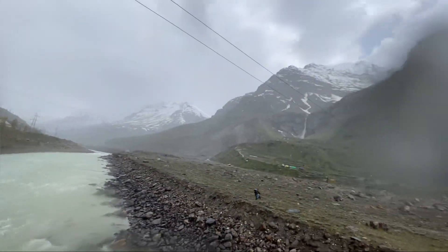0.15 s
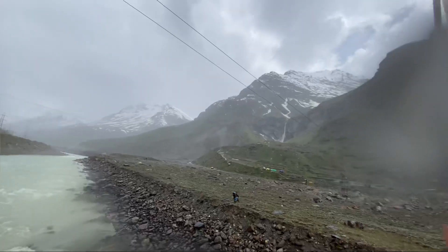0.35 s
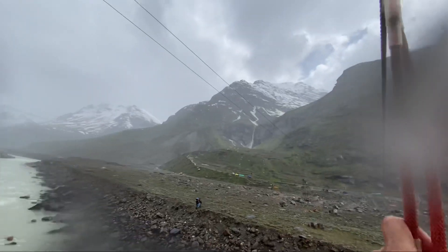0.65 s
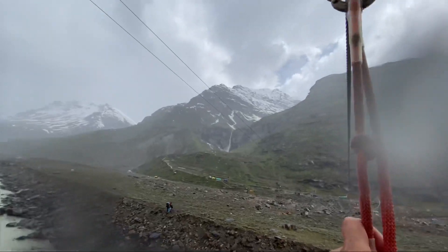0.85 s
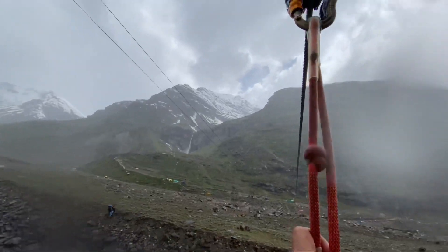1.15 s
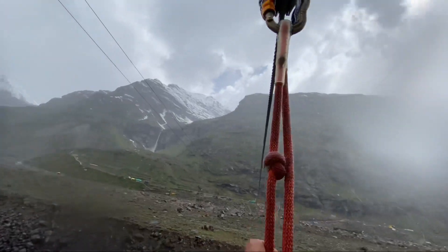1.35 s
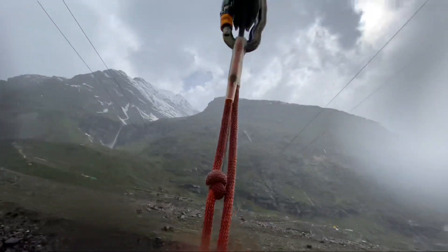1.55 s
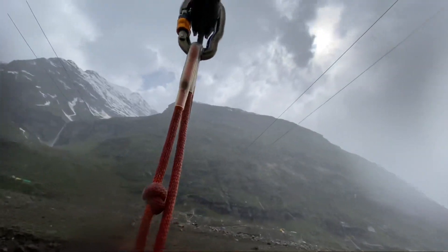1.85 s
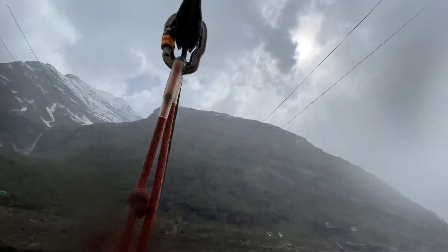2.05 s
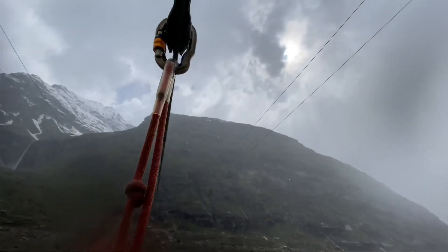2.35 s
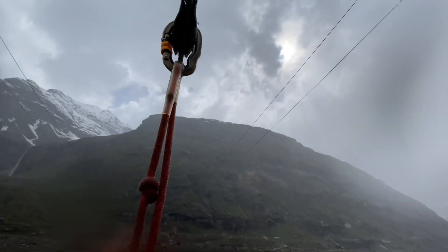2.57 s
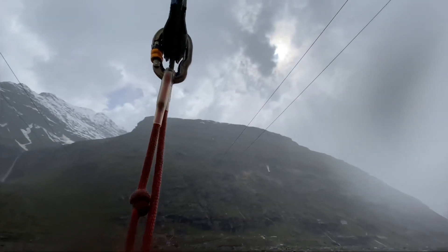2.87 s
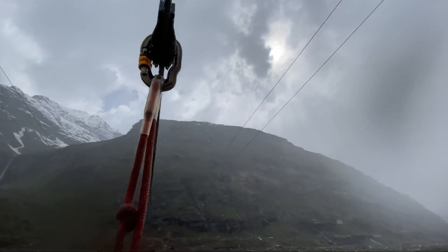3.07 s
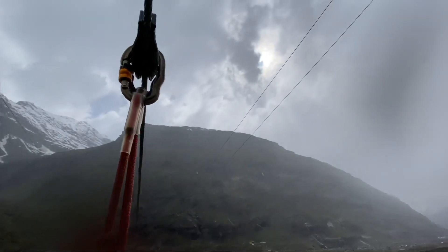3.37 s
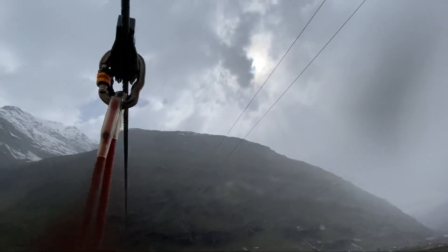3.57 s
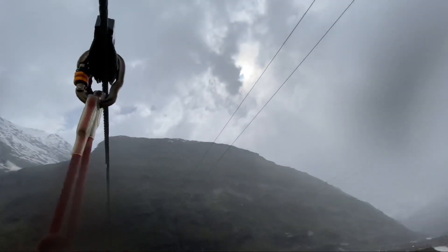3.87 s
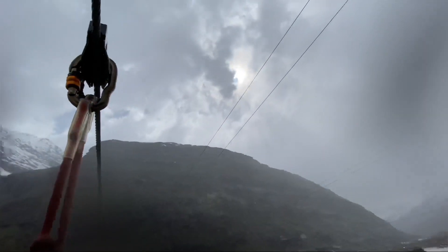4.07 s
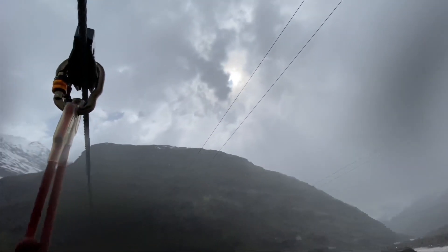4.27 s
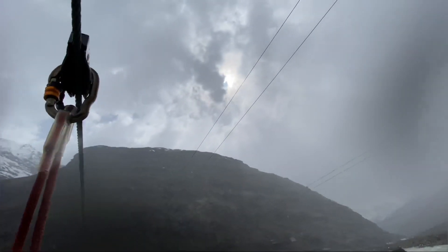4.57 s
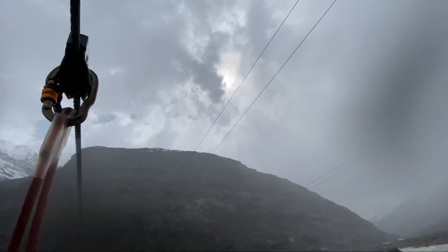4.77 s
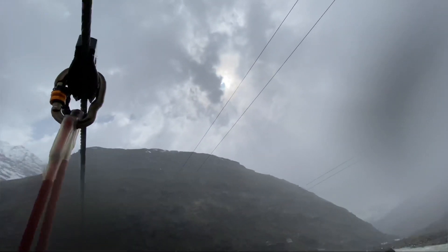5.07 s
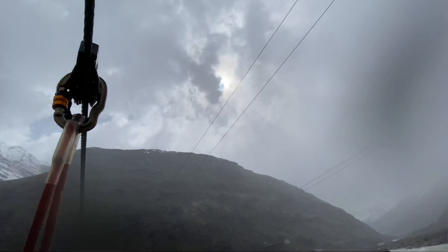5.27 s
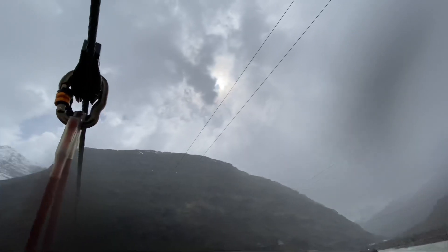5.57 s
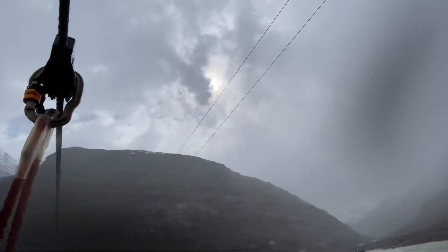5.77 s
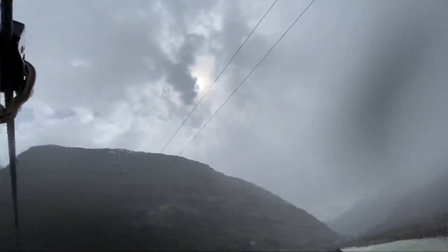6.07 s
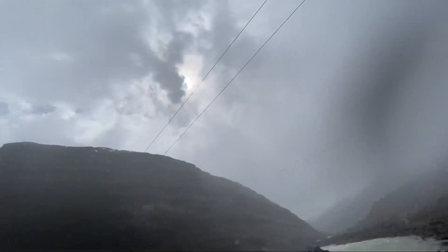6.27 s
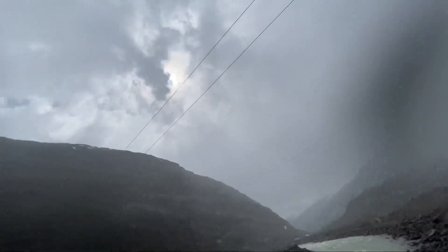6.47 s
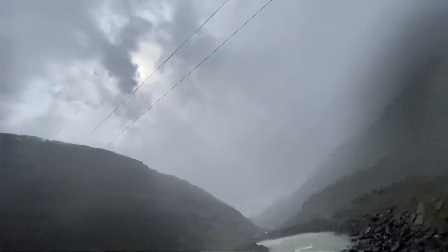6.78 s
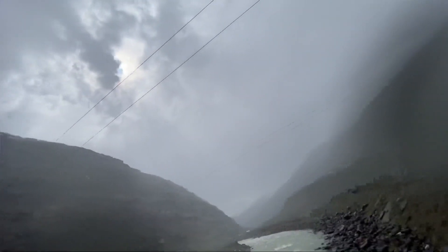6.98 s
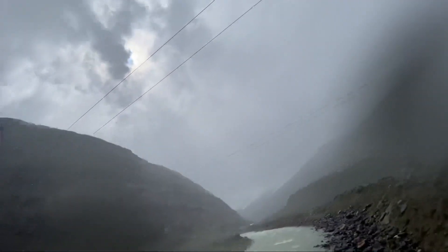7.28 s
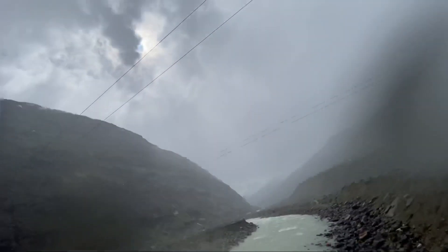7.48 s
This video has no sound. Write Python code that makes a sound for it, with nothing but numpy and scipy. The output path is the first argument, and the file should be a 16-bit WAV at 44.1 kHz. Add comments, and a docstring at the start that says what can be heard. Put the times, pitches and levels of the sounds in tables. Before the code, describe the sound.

Wind gusts over the microphone as a zip line trolley hisses overhead, its thin whine slowly sinking, ending with a few dull harness knocks.

```python
"""Cable trolley in a windy valley

A pulley trolley rolls along a steel cable, heard from just below on a hand-held camera's stereo mics.
Each strand of the cable kicks the sheave: a falling whine and a gritty rush that rings the trolley frame.
Wind buffets and pops right on the mic ports, and the harness knocks as the ride is checked at the end.
The camera slowly turns, shifting the sound from the right port to the left."""
import sys
import numpy as np
from scipy import signal
from scipy.fft import rfft, irfft
from scipy.io import wavfile
from scipy.ndimage import uniform_filter1d

SR = 44100
rng = np.random.default_rng(int(sys.argv[2]) if len(sys.argv) > 2 else 0)


def put_to_file(sound):
    """Save the sound as 16-bit audio at rate SR, in the file named by the first command-line argument."""
    columns = np.atleast_2d(sound).T  # one column per channel
    safe = np.clip(columns, -1, 1)
    whole_steps = np.round(safe * 32767)
    wavfile.write(sys.argv[1], SR, whole_steps.astype(np.int16))


N = 336483
HOP, SIZE = 256, 512  # short-time spectra, in samples

# The trolley slows overhead: time_s, strands_per_s
STRAND_RATE = [(0, 462), (1.7, 442), (2.5, 435), (2.7, 424), (3.1, 412), (3.6, 414), (4.2, 396), (4.8, 383),
               (5.5, 373), (6.15, 355), (7.63, 335)]
# Rate waver of the out-of-true sheave: time_s, once_per_cycle_share, twice_per_cycle_share
SHEAVE_WAVER = [(1.7, .014, .006), (3.5, .011, .012), (4.5, .008, .022), (6.6, .006, .032),
                (7.0, .004, .012)]
def sheave():
    """The wobbling sheave rolls over the strands: mean rate, running strand count and wobble phase."""
    cycle_strands, crest_s = 97.5, 6.52  # length of one wobble, a moment when it peaks
    t = np.arange(N) / SR
    rate_hz = columns(STRAND_RATE, t)[0]
    travel = np.cumsum(rate_hz) / SR
    cycle = 2 * np.pi * (travel - travel[round(crest_s * SR)]) / cycle_strands
    once, twice = columns(SHEAVE_WAVER, t)
    waver = 1 + once * np.cos(cycle) + twice * np.cos(2 * cycle) + 0.0081 * smooth_noise(2500)
    return rate_hz, np.cumsum(rate_hz * waver) / SR, cycle


def strand_kicks(strands, cycle):
    """Two noises pulsed by each strand's own fading kick; loose grit ticks, and each wobble throbs."""
    kick_depth, ticks_per_s, throb_db = 0.083, 600, 0.38
    grit = gain_of(smooth_noise(150))
    strength = gain_of(-2 * rng.standard_normal(N))[strands.astype(int)]
    kicks = 1 + kick_depth * strength * np.exp(-(strands % 1))
    ticking = rng.random(N) < ticks_per_s / SR
    ticks = ticking * gain_of(4 + 1.5 * np.minimum(rng.exponential(size=N), 4))
    throb = gain_of(throb_db * np.cos(cycle + 1.5))  # crests ahead of the pitch
    return unit_rms(kicks * grit * throb * (1 + ticks)) * rng.standard_normal((2, N))


# The camera turns below the trolley: time_s, left_lag_us, low_ring_db, fizz_db, left_over_right_4khz_db
CAMERA_TURN = [(0.0, 144, 4.5, -4, -3.5), (0.25, 125, 4.5, -1, -2.5), (0.6, 63, 0, -5, -1),
               (1.0, 11, 0, -2, -0.2), (1.24, -1, -0.7, -0.5, -0.4), (1.4, -52, -1.5, -1, 0),
               (1.55, -114, -4, 1, -0.5), (1.7, -150, -4.5, 1, 1), (2.0, -213, -7.5, 1, -0.3),
               (2.4, -225, -7.5, -3.5, 0), (2.65, -212, -6, -3, -0.7), (2.92, -224, -6.5, -4.5, -.8),
               (3.2, -250, -8, -4.5, -.6), (3.5, -268, -8.5, -6, -0.2), (3.85, -308, -6, -6.5, -1),
               (4.5, -338, -5.5, -4, -1), (5.2, -320, -6.5, -5, -0.9), (5.55, -306, -6.5, -6, -0.3),
               (5.75, -327, -6, -5.5, -0.8), (6.05, -368, -5.5, -2.5, -1.2), (6.25, -384, -3, -5, -1.5),
               (6.5, -423, -2.5, -7.5, 0.5), (6.85, -451, 0, -6.5, -1.5), (7.05, -455, 2.5, -10.5, 0.5),
               (7.63, -449, 2.5, -7.5, -0.5)]
# Six bearings of the trolley, from left to right: left_lag_us
BEARINGS_US = [-450, -400, -320, -230, 40, 140]
# Frame resonances from below: pitch_hz, width_hz, then level_db at each bearing
FRAME_MODES = [(1020, 175, 8, -13, -1.5, -5.5, -33, 0), (1360, 480, 4.5, -2, -3, -3, -43, -22),
               (1668, 540, -5, -2, 4, 3.5, -3.5, -3.5), (1900, 110, -14, -15, -9, -9, -5, 0),
               (1973, 394, -1.5, -4, 1, 4.5, 4.5, 0), (2496, 800, -1.5, -4.5, 1.5, -0.5, -2.5, -8.5),
               (2900, 300, 3.5, -7, -12, -7, -33, -8), (3170, 233, 4, -1.5, -3.5, -3.5, 1.5, 0),
               (3493, 235, -12, 3, -0.5, 0.5, -2.5, -21), (3830, 120, -14, -12, -11, -2, -8, 3),
               (4380, 150, -14, -12, -14, -10, -3, -8), (3806, 327, -0.5, 0, 1, 2.5, -3.5, 7),
               (4290, 560, -0.5, -8, -5, -2, 3, 3.5), (4606, 210, 2, 0.5, 1, -0.5, -6, 0),
               (4970, 390, 0.5, -5, -12, -6.5, -2, -14), (5370, 650, -2.5, -12, -4.5, -5, -1, -1.5),
               (5890, 320, -8, -24, -11, -14, -8.5, -7), (6230, 1200, 0, -5.5, -8.5, -9.5, -7.5, -12.5),
               (7370, 620, -3, -29, -5.5, -8, -12, -10), (7800, 890, -7, -23, -14, -8.5, -4.5, -7),
               (8500, 400, -6, -14, -24, -18, -12, -12), (8810, 680, -3.5, -7, -4, -6.5, -5, -5),
               (9680, 1050, -6, -12.5, -8, -10.5, -9, -10)]
def frame_ring(hz, times):
    """Gain of the trolley frame's resonances, whose colour changes with the camera's bearing."""
    lag_us, low_db, fizz_db, _ = columns(CAMERA_TURN, times)
    power = 0
    for pitch_hz, width_hz, *bearing_db in FRAME_MODES:
        band_db = low_db if pitch_hz < 2700 else fizz_db if pitch_hz > 6000 else 0
        peak = 1 / (1 + (2 * (hz - pitch_hz) / width_hz) ** 2) ** 1.78
        power = power + peak * gain_of(2 * (np.interp(lag_us, BEARINGS_US, bearing_db) + band_db))
    return np.sqrt(power)


# The rush as it reaches the camera: time_s, relative_level_db
RUSH_LEVEL = [(0.0, -28), (0.2, -29), (0.6, -28.5), (0.9, -30), (1.2, -31), (1.42, -31), (1.62, -31.5),
              (1.9, -29.5), (2.2, -26.5), (2.48, -24.5), (2.62, -27), (2.95, -24), (3.08, -26),
              (3.4, -23.5), (3.52, -24.5), (3.63, -24), (3.8, -24.5), (4.15, -26.5), (4.5, -27),
              (5.62, -27), (5.72, -28), (6.0, -27.5), (6.3, -27.5), (6.4, -23), (6.5, -27.5), (6.75, -31),
              (7.05, -34), (7.3, -28.5), (7.63, -32.5)]
# Brief sags of the rush, deeper in the treble: centre_s, length_s, depth_at_5khz_db
RUSH_SAGS = [(7.052, 0.075, 12.5), (7.14, 0.061, 6), (7.248, 0.071, 8), (7.383, 0.049, 3.5)]
# The highest hiss fades near the end: (start_s, end_s), (start_cut_db, end_cut_db)
HISS_FADE = [(6.6, 7.0), (0, 8)]
# The microphones' colouring of the rush: frequency_hz, gain_db
MIC_COLOUR = [(600, -13), (1300, -2.5), (1500, 0), (10000, 1.5), (11000, 6), (12300, -51), (13000, -32),
              (14300, 9), (15200, -5)]
def rush(strands, cycle):
    """Rolling noise overhead: the kicks ring the frame. Gives short-time spectra of two noises."""
    kicks = spectra(strand_kicks(strands, cycle))
    hz, times = axes(kicks)
    ring = frame_ring(hz, times)
    patches = rng.standard_normal(ring.shape[::-1]).T  # flicker across pitch and time
    patches = uniform_filter1d(patches, size=5, axis=0)
    patches = unit_rms(uniform_filter1d(patches, size=20, axis=1))
    level_db = columns(RUSH_LEVEL, times)[0] + 9.56 + 0.38 * drift(times, top_hz=16) + 1.22 * patches
    sag_db = sum(db * np.exp(-((times - s) / (length / 2)) ** 4) for s, length, db in RUSH_SAGS)
    cut_db = sag_db * (hz / 5000) ** 0.17 + np.interp(times, *HISS_FADE) * (hz > 12500)
    return kicks * ring * gain_of(level_db - cut_db + at_hz(MIC_COLOUR, hz))


# The whine at the strand rate: time_s, base_level_db
WHINE_LEVEL = [(1.7, -55.5), (2.1, -59), (2.55, -60), (2.9, -50.5), (3.45, -51), (3.9, -53), (4.4, -52.5),
               (4.9, -50), (5.5, -50), (6.3, -47.5), (7.02, -44.5)]
# Its octave: time_s, base_level_db
OCTAVE_LEVEL = [(1.7, -63), (2.1, -59), (2.6, -67), (3.2, -62), (3.6, -62), (4.3, -60.5), (5.1, -62),
                (6.1, -54), (7.0, -53)]
# Its harmonics: multiple, lift_db, blur_hz, steady_to_blurred_ratio
HARMONICS = [(1, 1.5, 22, 1.5), (2, 0, 22, 0.9), (3, 6.5, 35, 0.5), (4, 12, 45, .3)]
# When the whine stands clear of the wind: time_s, gain
WHINE_GATE = [(1.62, 0), (1.72, 1), (7.0, 1), (7.05, 0)]
def whine(rate_hz, strands):
    """The sheave sings at the strand rate and its multiples; uneven strands blur the higher ones."""
    t = np.arange(N) / SR
    resonance_hz, width_hz = 410.4, 17  # harmonics 3 and 4 swell as the strand rate passes through
    upper_db = -59 + 10.5 / (1 + (2 * (rate_hz - resonance_hz) / width_hz) ** 2)
    levels_db = [columns(WHINE_LEVEL, t)[0], columns(OCTAVE_LEVEL, t)[0], upper_db, upper_db]
    out = np.zeros(N)
    for (multiple, lift_db, blur_hz, steady), level_db in zip(HARMONICS, levels_db):
        pole = np.exp(-np.pi * blur_hz / SR)
        noise = rng.standard_normal(N) + 1j * rng.standard_normal(N)
        blur = unit_rms(signal.lfilter([1 - pole], [1, -pole], noise))
        envelope = (steady + blur) * np.sqrt(2 / (1 + steady ** 2))
        out += gain_of(level_db + lift_db) * (envelope * np.exp(2j * np.pi * multiple * strands)).real
    return out * columns(WHINE_GATE, t)[0]


# Valley wind on the microphones, base levels: time_s, rumble_db, buffet_db, roar_db
WIND_LEVELS = [(0.0, -54, -40, -35.5), (0.36, -48, -42.5, -37), (0.45, -50, -30, -42.5),
               (0.65, -42, -36, -39.5), (0.85, -43, -34.5, -42), (1.0, -44, -36.5, -40),
               (1.2, -43, -44.5, -42.5), (1.4, -43.5, -44, -46.5), (1.6, -47, -46, -51),
               (1.76, -54, -65, -59), (2.1, -61, -63, -57.5), (2.45, -57, -59, -54.5),
               (2.75, -56, -54, -54.5), (3.05, -51, -53.5, -51), (3.55, -46, -49, -49),
               (3.8, -52, -49, -59), (4.3, -59, -53.5, -56.5), (4.6, -61, -52.5, -56),
               (4.9, -51, -56, -50.5), (5.2, -56, -52.5, -54), (5.5, -57, -49.5, -53.5),
               (5.8, -51.5, -55.5, -54), (6.5, -51, -57, -50.5), (6.82, -52, -52, -51.5),
               (6.93, -60, -53, -39.5), (7.63, -50, -65, -45)]
# Spectra of its three layers, each: frequency_hz, relative_level_db
RUMBLE_COLOUR = [(20, -42), (32, -26), (45, -2), (70, 1.5), (110, -4), (170, -37), (300, -50)]
BUFFET_COLOUR = [(60, -10.5), (110, 0), (170, -1.5), (230, -3.5), (300, -4.5), (400, -12), (700, -50)]
ROAR_COLOUR = [(200, -3.5), (330, 4), (500, 1), (750, 4.5), (1150, -6.5), (1400, -1.5), (2000, -73)]
# Gusts: centre_s, length_s, lift_db, brightness (negative favours the rumble, positive the roar)
WIND_GUSTS = [(0.27, 0.076, 7.5, -0.53), (0.365, 0.11, 7.5, -0.47), (1.496, 0.15, 4.5, -0.32),
              (2.572, 0.043, 7, -0.89), (2.74, 0.15, 6, -0.66), (3.623, .12, -1.5, -0.46),
              (3.94, 0.17, 1, -0.7), (4.762, 0.099, 5.5, -1.1), (5.126, 0.048, 6, -0.31),
              (5.233, .07, 3.5, -1.1), (5.48, 0.097, 1, -0.42), (5.885, .06, 0, .1), (7.045, 0.044, 5, -1),
              (7.13, 0.048, 1.5, 0.74), (7.202, 0.052, 3, -2), (7.303, 0.15, 6.5, -0.23),
              (7.62, .08, 3, -1.5)]
def wind():
    """Air hits the microphones: lumpy rumble, buffeting and roar, lifted by gusts. Gives two noises."""
    t = np.arange(N) / SR
    layers = [(RUMBLE_COLOUR, 2.6, 0, -1), (BUFFET_COLOUR, 2.8, 0, 0), (ROAR_COLOUR, 1.6, 2.5, 1)]
    out = 0
    for level_db, (colour, spread_db, trim_db, tilt) in zip(columns(WIND_LEVELS, t), layers):
        gust_db = sum(db * (1 + brightness * tilt) * np.exp(-((t - s) / (length / 2)) ** 2)
                      for s, length, db, brightness in WIND_GUSTS)
        lumps_db = spread_db * smooth_noise(1800)
        response = gain_of(at_hz(colour, np.fft.rfftfreq(N, 1 / SR)))
        noise = unit_rms(irfft(rfft(rng.standard_normal((2, N))) * response, N))
        out = out + noise * gain_of(level_db + gust_db + trim_db + lumps_db)
    return out


# Pops of air right on the ports: start_s, level_db, nominal_pitch_hz, length_cycles
AIR_POPS = [(1.878, -44, 70, 2.4), (2.714, -30, 73.4, 1.1), (2.948, -39, 85, 2.0), (3.36, -33, 121, 2.4),
            (3.403, -34, 110, 1.5), (3.451, -22, 260, 1.3), (3.462, -34, 150, 2.5), (3.535, -31, 150, 2.5),
            (3.883, -36, 111, 2.2), (3.937, -31.5, 80, 1.8), (7.018, -35, 112, 2.6),
            (7.04, -22.5, 328, 2.2), (7.047, -31, 200, 1.2), (7.296, -26.5, 104, 4.1)]
def air_pops():
    """Each pop is a quick push that sags in pitch, with a puff of air."""
    out = np.zeros(N)
    for start_s, level_db, pitch_hz, cycles in AIR_POPS:
        puff = unit_rms(uniform_filter1d(smooth_noise(24, length=5000), size=24))
        progress = np.arange(len(puff)) / SR * pitch_hz / cycles
        envelope = 3.3 * progress * np.exp(1 - 4.4 * progress)
        push = np.sin(2 * np.pi * cycles * np.minimum(progress, 2) ** 0.66)
        out[round(start_s * SR):][:len(puff)] += gain_of(level_db) * envelope * (push + 0.31 * puff)
    return out


# Harness knocks near the camera: start_s, level_db, pitch_hz, length_s
HARNESS_KNOCKS = [(7.013, -33, 500, .01), (7.093, -26, 385, .022), (7.138, -35, 470, .026),
                  (7.253, -30, 395, .014), (7.297, -31, 400, .034), (7.345, -36, 320, .03),
                  (7.507, -36, 280, .04), (7.432, -24, 1150, .007), (7.433, -25, 240, .010)]
def harness_knocks():
    """The harness knocks as the ride is checked: short dull rings, roughened by rattle."""
    out = np.zeros(N)
    t = np.arange(3000) / SR
    for start_s, level_db, pitch_hz, length_s in HARNESS_KNOCKS:
        hump = np.sin(np.pi * np.minimum(t / length_s, 1) ** 1.6)
        rattle = 1 + 0.26 * smooth_noise(120, length=len(t))
        ring = np.sin(2 * np.pi * pitch_hz * t)
        out[round(start_s * SR):][:len(t)] += gain_of(level_db) * hump * rattle * ring
    return out


# Phase that the camera's casing puts between the ports: frequency_hz, left_lead_rad
CASING_PHASE = [(1500, 0), (2300, -0.28), (3200, 0.5), (4500, -0.47), (5400, 0.5), (7100, 2), (7600, 3.03),
                (8200, 1.1)]
# Added until the camera has turned away: frequency_hz, left_lead_rad
FACING_PHASE = [(450, 0), (850, 1.9), (1100, 0), (1500, 0.023)]
# Added while the trolley is on the right: frequency_hz, left_lead_rad
RIGHT_PHASE = [(1000, -0.17), (1380, 0.64), (1750, -0.29), (2400, -0.23), (2750, -.3), (3100, -1),
               (3450, -.6), (3800, -0.37), (4150, 0.88), (4500, 0.3), (5200, 0.07)]
# Lags over which that grows: none_us, full_us
RIGHT_LAGS_US = [-40, 30]
# How much of each band follows the bearing: frequency_hz, share
MOVING_SHARE = [(200, 0.98), (500, 0.95), (5350, 0.96), (5700, 0.033), (6700, 0.069), (7050, 1),
                (8200, 0.97), (8550, 0.044), (10000, 0.033)]
# Phase of the part that stays put: frequency_hz, left_lead_rad
STILL_PHASE = [(9000, 0), (9250, 1.6), (9500, 1.4), (9750, 0.84), (10050, -0.17), (10800, -1.6), (12000, 0),
               (13500, 0.9)]
def port_paths(hz, lag_us, facing):
    """A lagged path and a still one add at the port, dipping where they cancel."""
    hollow = 0.3  # share of the dip's decibels that is kept
    on_right = np.interp(lag_us, RIGHT_LAGS_US, [0, 1])
    phase = at_hz(CASING_PHASE, hz) + facing * at_hz(FACING_PHASE, hz) + on_right * at_hz(RIGHT_PHASE, hz)
    lagged = np.exp(1j * (phase - 2 * np.pi * hz * lag_us / 1e6))
    moving = at_hz(MOVING_SHARE, hz)
    paths = moving * lagged + (1 - moving) * np.exp(1j * at_hz(STILL_PHASE, hz))
    return paths / (abs(paths) + 1e-3) ** (1 - hollow)


# Lags over which the camera comes to face away from the trolley: away_us, facing_us
TURN_LAGS_US = [-312, -270]
# How alike the noise is at the two ports: frequency_hz, facing_likeness, away_likeness
PORT_LIKENESS = [(60, 0.41, 0.55), (250, 0.31, 0.57), (550, 0.93, 0.22), (1000, 0.64, 0.83),
                 (1270, 0.68, 0.94), (1630, 0.83, 0.94), (2180, 0.71, 0.82), (2870, 0.73, 0.87),
                 (3380, 0.99, 1), (4170, 0.79, .9), (4830, 0.98, 1), (5330, 0.85, 0.83), (5470, 1, 0.98),
                 (6000, 0.9, 0.89), (7100, 0.92, .49), (7800, 1, 0.69), (8600, 0.48, .54),
                 (9000, 0.99, 0.8), (9200, 0.71, 1), (10000, .92, 1), (10900, 0.33, 0.27), (14000, 1, 1)]
# The bass leans right: frequency_hz, left_over_right_db
BASS_LEAN = [(80, 0.5), (280, -3.5), (500, -0.5), (750, 0)]
def mic_ports(noises, solid):
    """The bearing sets the ports' lag and balance; noise is partly unlike at each, solid sound alike."""
    hz, times = axes(noises)
    lag_us, *_, pan_db = columns(CAMERA_TURN, times)
    facing = np.interp(lag_us, TURN_LAGS_US, [0, 1])
    likeness = facing * at_hz(PORT_LIKENESS, hz) + (1 - facing) * at_hz(PORT_LIKENESS, hz, column=2)
    shade_db = pan_db * (hz / 4000) ** 0.5  # the camera body shades the treble most
    half_pan = gain_of((shade_db + at_hz(BASS_LEAN, hz)) / 2)
    paths = port_paths(hz, lag_us, facing)
    left = paths * (noises[0] + solid) * half_pan
    right_noise = likeness * noises[0] + np.sqrt(1 - likeness ** 2) * noises[1]
    right = abs(paths) * (right_noise + solid) / half_pan
    return signal.istft(np.array([left, right]), SR, "cosine", SIZE, SIZE - HOP)[1][:, :N]


def gain_of(db):
    """Decibels to gain."""
    return 10 ** (np.asarray(db) / 20)


def unit_rms(x):
    """Scales to rms 1."""
    return x / np.sqrt(np.mean(abs(x) ** 2) + 1e-20)


def smooth_noise(span, length=N):
    """Noise averaged over span samples, at rms 1."""
    return unit_rms(uniform_filter1d(rng.standard_normal(length), size=span))


def drift(t, top_hz):
    """Slow wander: sines of random phase up to top_hz."""
    hz = np.geomspace(top_hz / 12, top_hz, num=24)[:, None]
    return unit_rms((np.sin(2 * np.pi * (hz * t + rng.random(hz.shape))) / hz ** 0.03).sum(0))


def at_hz(rows, hz, column=1):
    """Reads a spectrum table on a log-frequency axis."""
    table = np.transpose(rows)
    return np.interp(np.log(hz + 1), np.log(table[0] + 1), table[column])


def columns(rows, t):
    """Every column of a curve table at times t."""
    times, *curves = np.transpose(rows)
    return [np.interp(t, times, curve) for curve in curves]


def spectra(x):
    """Short-time spectra."""
    return signal.stft(x, SR, "cosine", nperseg=SIZE, noverlap=SIZE - HOP)[2]


def axes(frames):
    """Frequencies (as a column) and times of short-time spectra."""
    return np.fft.rfftfreq(SIZE, 1 / SR)[:, None], np.arange(frames.shape[-1]) * HOP / SR


def scene():
    """Trolley overhead, wind, pops and knocks, all heard through the camera's two ports."""
    rate_hz, strands, cycle = sheave()
    rolling = rush(strands, cycle)
    tone = whine(rate_hz, strands)
    return mic_ports(rolling + spectra(wind()), spectra(tone + air_pops() + harness_knocks()))


# The camera keeps the bass mono below a sliding edge: time_s, edge_hz
MONO_EDGE = [(0, 750), (1.2, 750), (1.7, 590), (1.8, 450), (2.2, 450), (2.4, 320), (2.9, 380), (3.4, 360),
             (4.1, 330), (4.5, 230), (4.9, 190), (5.6, 20), (7.63, 10)]
def record(dry):
    """The camera folds the bass to mono and cuts the highest treble."""
    hz, times, side = signal.stft((dry[0] - dry[1]) / 2, SR, nperseg=2048, noverlap=1536)
    above_edge = hz[:, None] > columns(MONO_EDGE, times)[0]
    side = signal.istft(side * above_edge, SR, nperseg=2048, noverlap=1536)[1][:N]
    stereo = dry.mean(0) + np.array([side, -side])
    lowpass = signal.firwin(511, cutoff=15400, window=("kaiser", 9), fs=SR)
    return signal.oaconvolve(stereo, lowpass[None], "same")


dry = scene()
out = record(dry)
put_to_file(out)
```